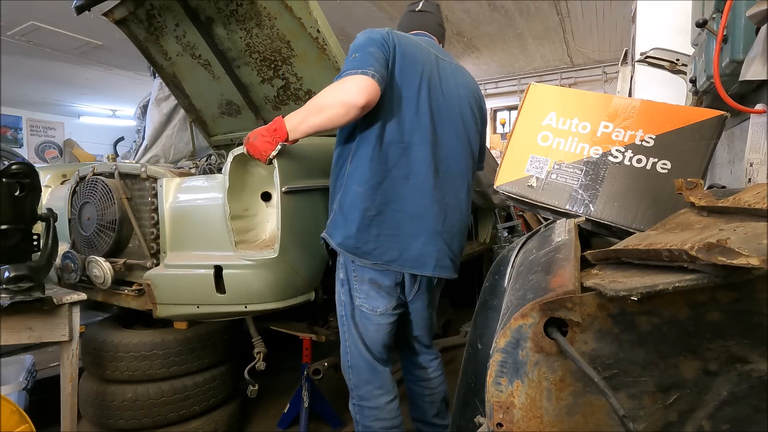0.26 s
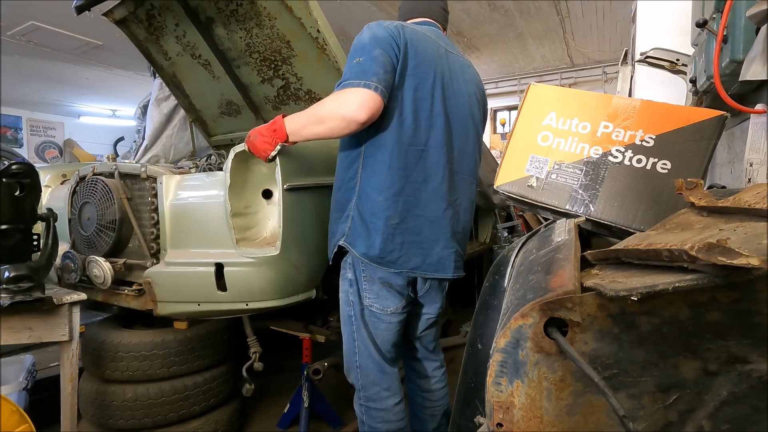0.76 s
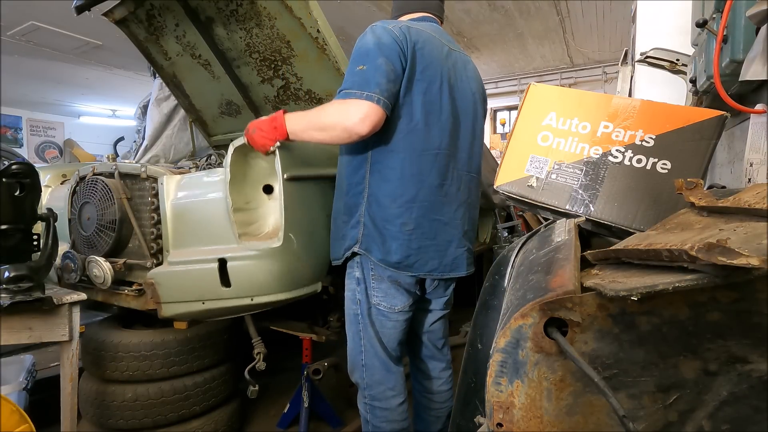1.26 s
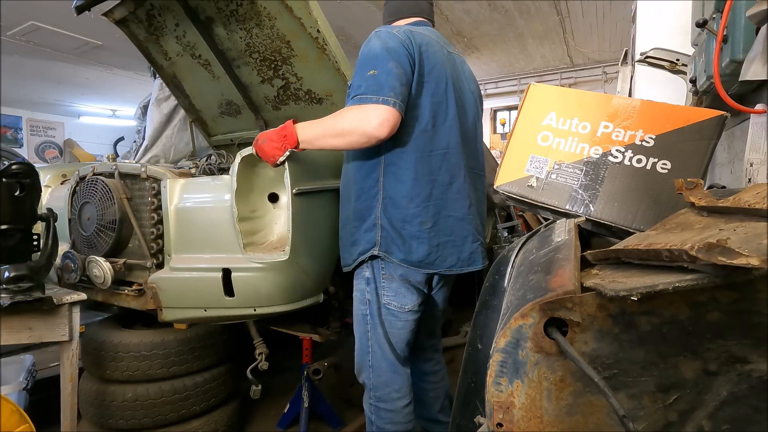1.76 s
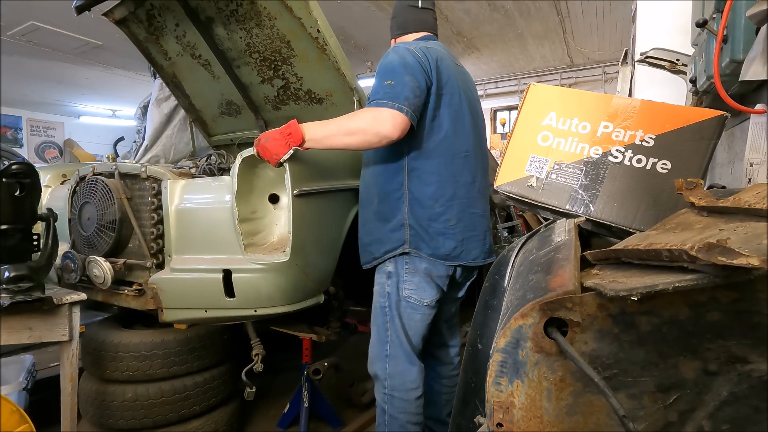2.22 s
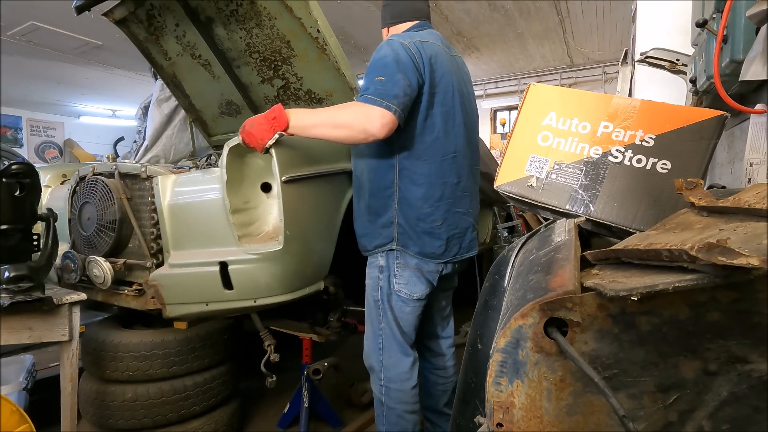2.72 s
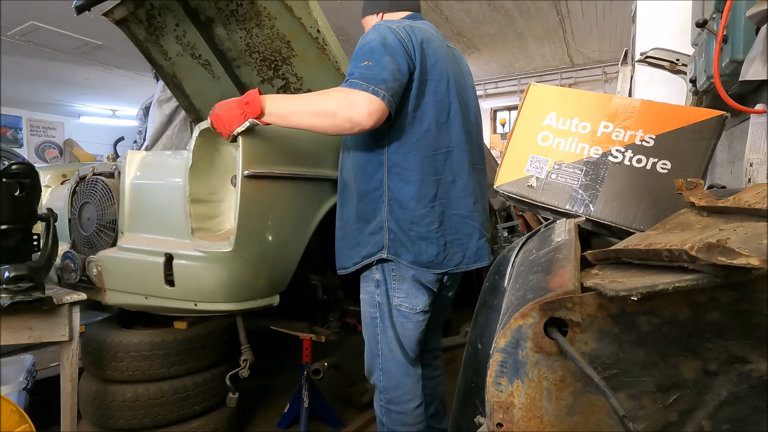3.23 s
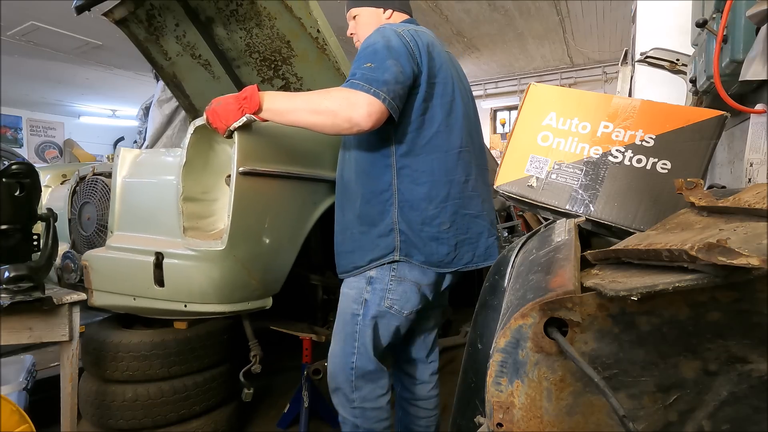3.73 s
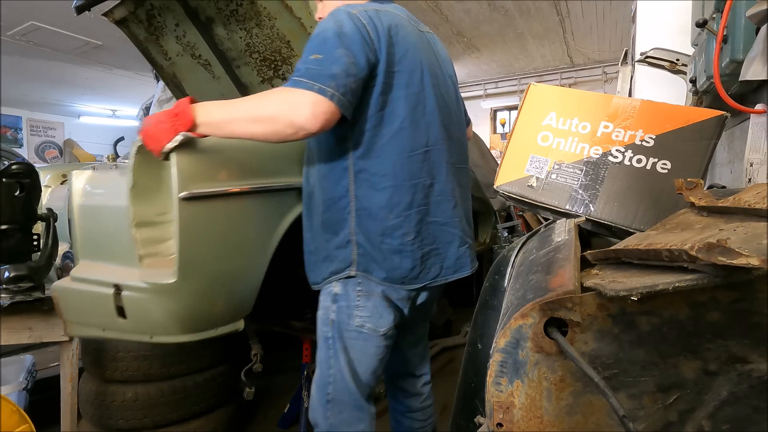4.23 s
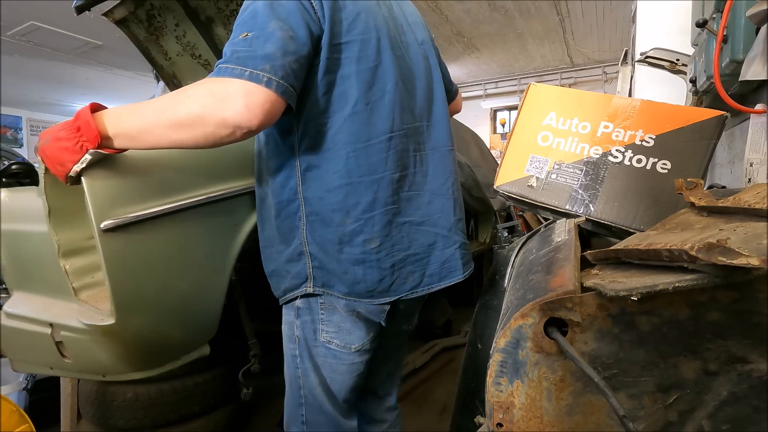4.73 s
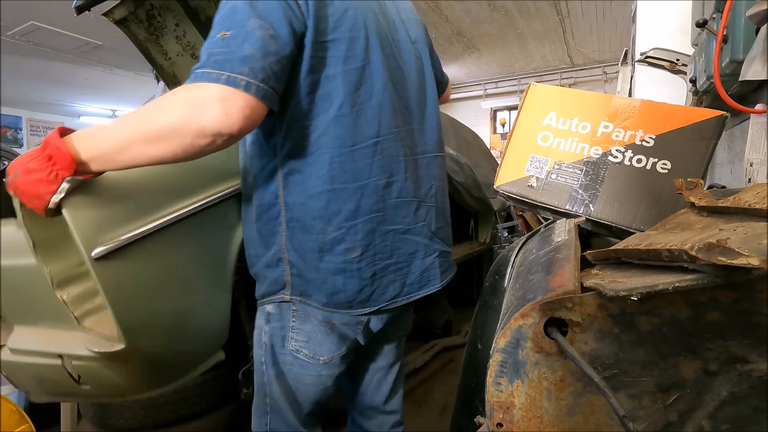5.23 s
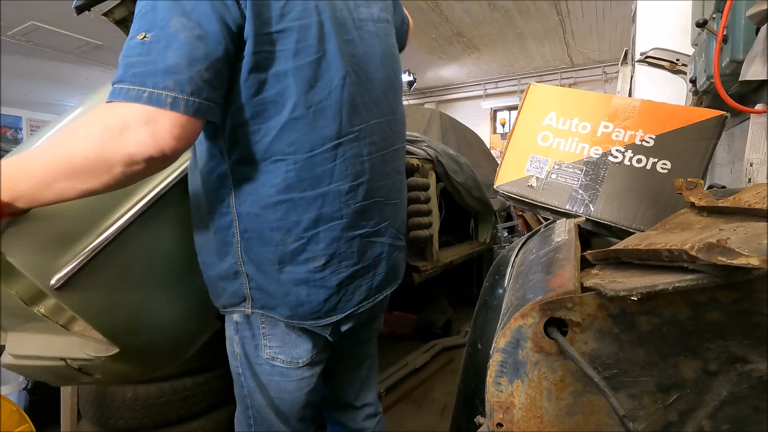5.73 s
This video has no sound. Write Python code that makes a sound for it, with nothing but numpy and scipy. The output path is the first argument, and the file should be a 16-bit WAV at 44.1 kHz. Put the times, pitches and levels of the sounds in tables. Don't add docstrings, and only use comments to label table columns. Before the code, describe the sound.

A large thin car panel is worked off by hand indoors. Bursts of dull metallic knocking and deep wobbling boom alternate with scrapes, peaking in a violent double clatter. It then hangs free with faint ticks and glove rustle, strikes the body once more with a short ring, and leaves with scuffs and small knocks. Close stereo pickup, moderate garage reverberation, faint steady hum.

```python
import sys
import numpy as np
from scipy import signal
from scipy.fft import rfft, irfft, next_fast_len
from scipy.io import wavfile
from scipy.ndimage import uniform_filter1d, map_coordinates

SR = 44100
rng = np.random.default_rng(int(sys.argv[2]) if len(sys.argv) > 2 else 0)


def to_linear_factor(level_db):
    exponent = np.asarray(level_db, float) / 20
    return 10 ** exponent


def unload_audio(sound):
    columns = np.transpose(np.atleast_2d(sound))
    steps = np.round(np.clip(columns, -1, 1) * 32767)
    wavfile.write(sys.argv[1], SR, steps.astype(np.int16))


N = 263277
FREE_S = 3.76
RASP_LOW_DB, RASP_TOP_DB = -12, -16


def unit(x):
    return x / np.sqrt(np.mean(x ** 2) + 1e-20)


def along(points, hz):
    f, v = np.transpose(points)
    return np.interp(np.log(hz + 1), np.log(f + 1), v)


def curves(rows):
    s, *cols = np.transpose(rows)
    return [np.interp(np.arange(N) / SR, s, c) for c in cols]


def wobble(rate):
    knots = rng.standard_normal(int(N * rate / SR) + 4)
    return map_coordinates(knots, [np.arange(N) * rate / SR])


def filtered(x, response):
    m = next_fast_len(x.shape[-1] + 4096)
    return irfft(rfft(x, m) * response(np.fft.rfftfreq(m, 1 / SR)), m)[..., :x.shape[-1]]


def add(out, s, sound):
    out[round(s * SR):][:len(sound)] += sound


# (frequency [Hz], likeness [0..1])
LIKENESS = [(60, .999), (150, 0.86), (400, 0.76), (1500, 0.58), (6000, 0.78), (12000, 0.82)]


def paired(two, spectrum):
    def shares(hz):
        turn = np.arccos(np.clip(along(LIKENESS, hz), -1, 1)) / 2
        return to_linear_factor(along(spectrum, hz)) * [np.cos(turn), np.sin(turn)]

    mid, side = filtered(two, shares)
    return np.array([mid + side, mid - side])


def dying(decays, size, channels):
    hz, t, z = signal.stft(rng.standard_normal((channels, size)), SR, nperseg=256)
    fade = to_linear_factor(-60 * t / along(decays, hz)[:, None])
    tail = signal.istft(z * fade, SR, nperseg=256)[1][:, :size]
    return tail / np.linalg.norm(tail[0])


def ringing(modes, t, damp, spread_db):
    hz, db, t60 = np.transpose(modes)[:, :, None]
    luck = rng.standard_normal((2, len(modes), 1))
    fade = to_linear_factor(db + spread_db * luck[0] - 60 * t / (np.clip(t60, .05, .7) * damp))
    return fade * np.sign(luck[1]) * np.sin(2 * np.pi * hz * t)


def favour(hz, centre_hz, octaves):
    return np.exp(-.5 * (np.log2((hz + 1) / centre_hz) / octaves) ** 2)


# (multiple, level [dB])
MACHINE = [(1, -34), (2, -17), (3, -20), (4, -70), (5, -8), (6, 14), (7, 12.5), (8, 10), (9, 7), (10, 4.5),
           (11, 16.5), (12, 14.5), (13, -7), (14, -8), (15, 6), (16, 4), (17, -3), (18, -25.5), (19, -45),
           (20, -21), (21, -14), (22, -30)]
# (frequency [Hz], level [dB per Hz])
AIR_COLOUR = [(90, -52), (140, -5), (200, -12.5), (289, -17), (364, -11.5), (458, -32.5), (560, -23.5),
              (850, -45.5), (1250, -35.5), (2230, -57), (7000, -41), (9000, -59.5), (14600, -76)]
# (time [s], level [dB])
MACHINE_LEVEL = [
    (0, -50.5),
    (2.3, -50.5),
    (3.3, -53),
    (4.3, -53),
    (5.6, -51),
    (5.66, -49.5),
    (5.97, -51.5),
]


def garage():
    shaft_hz = 25.77
    turn = 2 * np.pi * np.cumsum(shaft_hz * (1 + 0.00244 * wobble(1.78))) / SR
    hum = sum(to_linear_factor(db + 2.9 * wobble(9.3)) * np.sin(k * turn + 0.97 * rng.standard_normal())
              for k, db in MACHINE)
    air = paired(rng.standard_normal((2, N)), AIR_COLOUR)
    return to_linear_factor(curves(MACHINE_LEVEL)[0] - 1.0) * unit(hum) * to_linear_factor([[.3], [-.3]]) + to_linear_factor(-58) * unit(air)


# (frequency [Hz], t60 [s])
WALL_DECAY = [(80, 0.52), (200, 0.81), (500, 0.55), (2000, 0.67), (10000, 0.48)]


def walls():
    tail = paired(dying(WALL_DECAY, SR * 3 // 4, channels=2), [(100, 0.0077)])
    return np.pad(tail, ((0, 0), (260, 0)))


TAIL_STARTS = [0, .53, 1.3, 1.53, 1.68, 2.02, 2.63, 2.75, 3.19, 4.38, 4.77]


def changing_answer(x):
    out = np.zeros((2, N + SR))
    marks = [round(s * SR) for s in TAIL_STARTS] + [N]
    for a, b in zip(marks, marks[1:]):
        echo = signal.fftconvolve(x[None, a:b], walls(), axes=1)
        out[:, a:a + echo.shape[1]] += echo
    return out[:, :N]


# (frequency [Hz], t60 [s])
NEAR_DECAY = [(200, .03), (2000, 0.049), (10000, 0.11)]
# (frequency [Hz], level [dB])
UNLIKENESS = [(100, -39), (400, -14), (1500, -2.5), (4000, -7), (12000, -28.5)]


def near_echoes(edge):
    near = dying(NEAR_DECAY, SR // 10, channels=1)[0]
    echoes = filtered(signal.fftconvolve(edge, near)[:N], lambda hz: to_linear_factor(along(UNLIKENESS, hz)))
    return echoes * [[1], [-1]]


# (time [s], level [dB])
STROKES = [(0.0, -63.5), (0.25, -64.5), (0.45, -57), (0.62, -47), (1.15, -65.5), (1.51, -59.5),
           (1.7, -43.5), (2.18, -68.5), (2.5, -57.5), (2.7, -39), (3.0, -55), (3.62, -60.5), (4.1, -72),
           (4.56, -57.5), (5.2, -66), (5.33, -56), (5.7, -51), (5.97, -62)]
# (frequency [Hz], level [dB per Hz])
RUSH_COLOUR = [(760, -20), (1300, -5), (1640, -9.5), (1800, -6), (2530, -8), (2830, -9.5), (5090, -13),
               (12000, -28.5), (14600, -47)]
# (frequency [Hz], level [dB per Hz])
GRIND_COLOUR = [(300, -37), (550, 2), (800, -6.5), (1250, -0.5), (1700, -14), (2800, -43.5)]


def rub():
    press = to_linear_factor(.7 * wobble(25))
    rush = rng.standard_normal((2, N))
    grit = unit(rng.standard_normal((2, N)) * (rng.random(N) < .012))
    return press * (rush + to_linear_factor(-6) * grit)


def scrape():
    rush_db, = curves(STROKES)
    grind_db = rush_db + 18.5 + 0.63 * shaking()
    rush = to_linear_factor(rush_db - 2.0) * unit(paired(rub(), RUSH_COLOUR))
    return rush + to_linear_factor(grind_db) * unit(paired(rub(), GRIND_COLOUR))


def shaking():
    settle_s, still_db = 0.93, -41.5
    t = np.arange(N) / SR
    power = sum(to_linear_factor(2 * (db - 60 * (t - s) / settle_s)) * (t > s) for s, db, *rest in BENDS)
    return 10 * np.log10(np.abs(uniform_filter1d(power, size=SR // 25)) + to_linear_factor(2 * still_db))


# (frequency [Hz], level [dB per Hz])
RUMBLE_COLOUR = [(15, -6), (30, 2), (60, 16.5), (85, -10.5), (120, -51.5)]


def rumble():
    noise = to_linear_factor(5.9 * wobble(14)) * rng.standard_normal(N)
    deep = filtered(noise, lambda hz: to_linear_factor(along(RUMBLE_COLOUR, hz)))
    freed_db, = curves([(FREE_S, 0), (FREE_S + 0.14, -20.5)])
    return to_linear_factor(-34 + 0.61 * shaking() + freed_db) * unit(deep)


# (frequency [Hz], level [dB], t60 [s])
PANEL_MODES = [(51.7, -7, 0.35), (66.03, 3.5, 0.25), (77.78, -8.5, 0.93), (102, 1.5, 0.28),
               (121, 1.5, 0.18), (146.3, -2, 0.41), (168.5, -1.5, 0.27), (202, -6, 0.43),
               (217.06, -3.5, 0.38), (242.2, -1, 0.16), (278.5, -0.5, 0.22), (333, 0.5, 0.18),
               (368.2, -9, 0.33), (393.8, -3.5, 0.17), (447, -4.5, 0.048)]
# (time [s], peak level [dB], favoured pitch [Hz], deep share [dB], ring time [factor])
BENDS = [(0.0003, -29.5, 170, 5.5, 0.86), (0.569, -25, 174, -12, 0.59), (0.636, -14.5, 156, 3, 1.9),
         (0.689, -23, 75, 4, 1.7), (0.735, -15.5, 94, -2.5, 1.22), (0.806, -25.5, 164, 1, 1.2),
         (0.89, -26.5, 74.4, 8, 0.79), (1.037, -34, 56, 12.5, 0.72), (1.344, -24.5, 158.4, 1.5, 2.9),
         (1.476, -21.5, 101, 0, 0.35), (1.522, -25, 85, 3, 2.4), (1.705, -22, 247, -30, 2.5),
         (1.735, -18.5, 406, -5, 0.78), (1.777, -20.5, 52.7, -14, 1.47), (2.655, -11, 163.8, -9.5, 2),
         (2.701, -17, 165, -1, 1.8), (2.748, -12.5, 102, 0.5, 0.63), (2.8, -18, 139, 3.5, 1.02),
         (2.861, -19, 59.2, -12, 1.12), (3.042, -34, 152.5, 10.5, 0.55), (4.394, -23, 217, -0.5, 2.4),
         (4.437, -32.5, 66.6, 2, 1.8), (4.53, -24, 202, -15, 0.36)]
# (time [s], peak level [dB], favoured pitch [Hz], deep share [dB])
SHIFTS = [(0.075, -41, 131.7, 10), (0.6, -25, 145, 0), (1.41, -30.5, 112.5, -1), (1.619, -38, 121, 16),
          (2.039, -41.5, 73.5, 8.5), (2.258, -45.5, 72, 8.5), (2.499, -42, 166, -27), (2.582, -34, 157, -7),
          (3.138, -42.5, 53.6, 12), (3.267, -47, 70.5, 10), (3.346, -48.5, 58.7, 9), (3.496, -42, 302, -22),
          (3.714, -43.5, 128, 7.5), (4.187, -54, 286, -0.5), (4.607, -73, 202, -5), (4.726, -63, 193, -28),
          (5.263, -43, 162, 1), (5.804, -58, 158, 7)]


def boom():
    push_s = 0.0042
    out, t = np.zeros(N + SR), np.arange(SR * 3 // 5) / SR
    modes_hz = np.transpose(PANEL_MODES)[0]
    for s, db, centre_hz, deep_db, damp in BENDS + [(*row, 1) for row in SHIFTS]:
        upper_db = -4.5 if s < FREE_S else -3
        share_db = along([(95, deep_db), (125, 0.0067), (185, 0.0045), (215, upper_db)], modes_hz)
        share_db = share_db + 11 * favour(modes_hz, centre_hz, 0.067)
        ring = to_linear_factor(share_db) @ ringing(PANEL_MODES, t, np.clip(damp, .2, 2), spread_db=1.5)
        add(out, s, to_linear_factor(db - 9) * ring * (1 - np.exp(-t / push_s)))
    return out[:N]


# (frequency [Hz], level over the crowd [dB], t60 [s])
STEEL_MODES = [(447, 0.5, 0.32), (563, -1.5, 0.95), (724, 1, 0.77), (850, -14, 0.17), (1040, 2, 0.11),
               (1224, 0.5, 0.11), (1300, -13, 0.26), (1670, -24, 0.23), (1760, -14, 0.17),
               (2100, -19, 0.18), (2290, 4.5, 0.27), (2500, 8, 0.16), (3000, -2.5, 0.12), (3090, 5, 0.18),
               (3400, -5, 0.31), (4280, 12.5, .15), (5380, -2.5, 0.14), (6960, 12.5, 0.11)]
# (frequency [Hz], t60 [s])
CROWD_DECAY = [(400, 0.76), (1500, 0.18), (4000, 0.19), (12000, 0.097)]
# (frequency [Hz], level [dB per Hz])
CONTACT_COLOUR = [(200, -20), (400, -3.5), (700, -5.5), (1500, -4.5), (2500, -12.5), (4500, -14),
                  (7000, -16.5), (10000, -21.5), (14600, -35.5)]


def contact(row, ms, damp, swell, spike, favour_db):
    s, db, centre_hz, low_db, top_db = row
    t, ms = np.arange(SR // 3) / SR, np.clip(ms, 1, 40)
    u = t[:SR // 8] * 1000 / ms
    spikes = rng.standard_normal(len(u)) * to_linear_factor(spike * rng.standard_normal(len(u)))
    chatter = spikes * u ** swell * np.exp(-u)
    crowd = dying([(hz, t60 * damp) for hz, t60 in CROWD_DECAY], len(t), channels=1)[0]
    crowd[0] += to_linear_factor(-4.5)
    clear = ringing(STEEL_MODES, t, damp, spread_db=2).sum(0)
    clear = clear * (1 - np.exp(-t * 1000 / ms)) ** (1 + swell)
    steel = unit(signal.fftconvolve(chatter, crowd)[:len(t)])
    steel = steel + to_linear_factor(-16.0 + 0.11 * (db + 16.5)) * unit(clear)
    tilt = [(800, low_db - 2.0), (2000, 0.0036), (3500, 0.039), (8000, top_db + 12.5)]

    def colour(hz):
        return to_linear_factor(along(CONTACT_COLOUR, hz) + along(tilt, hz) + favour_db * favour(hz, centre_hz, .26))

    hit = filtered(steel, colour)
    band = filtered(hit[:SR // 15], lambda hz: (hz > 1500) & (hz < 5000))
    return to_linear_factor(db - 16.0) * hit * np.cos(np.pi / 2 * t / t[-1]) / band.std()


# (time [s], peak level [dB], favoured pitch [Hz], low share [dB], top [dB])
RATTLES = [(0.692, -38.5, 3000, -11, -23), (1.3348, -35.5, 1510, 2, -22.5), (1.39, -52, 1180, -6, -24),
           (1.44, -48, 1200, 12, -19), (1.6057, -36, 2500, 8.5, -11.5), (2.763, -30, 3900, -5, -15),
           (3.232, -46, 5000, -21, -5), (3.39, -77, 1970, -7, -20), (3.513, -44, 4500, -3, -4),
           (3.6, -48.5, 2200, -18, -16), (4.531, -31.5, 5500, -13, -19), (4.7874, -49.5, 5800, -21, -14)]
# (time [s], peak level [dB], favoured pitch [Hz], swell time [ms])
CLOTH = [
    (3.25, -49, 4400, 26),
    (3.301, -64, 3530, 20),
    (4.94, -47.5, 3000, 42),
    (5.05, -44.5, 3000, 36),
    (5.752, -44, 3500, 6.6),
    (3.17, -50, 2000, 20),
    (3.74, -53, 2500, 22),
]


def rebounds():
    out = np.zeros(N + SR)
    rows = [(*row, 3.5) for row in RATTLES]
    rows += [(s, db, hz, RASP_LOW_DB, RASP_TOP_DB, ms) for s, db, hz, ms in CLOTH]
    for *row, ms in rows:
        add(out, row[0], contact(row, ms=ms, damp=0.98, swell=0.31, spike=6.1, favour_db=5))
    return out[:N]


# (time [s], peak level [dB], favoured pitch [Hz], low share [dB], top [dB])
GLANCES = [(0.4547, -29, 1000, -10.5, -23.5), (0.566, -26, 2384, 7, -22), (0.584, -26, 1250, 15, -11.5),
           (0.6094, -24, 563, 3, -64.5), (1.1439, -42.5, 1210, -3.5, -49), (1.691, -21, 1040, 2, -17.5),
           (2.583, -38.5, 1320, 5, -13.5), (3.72, -47.5, 880, 2.5, -5), (2.6679, -12, 2370, -33, -11),
           (2.7576, -16, 1120, -13, -21.5), (2.774, -27.5, 3270, 10, -41.5), (4.58, -47.5, 620, 6, -36.5),
           (4.826, -38, 738, 2, -7.5), (5.5567, -52, 1300, 9, -22.5), (5.9104, -45, 2160, -9, -22)]
# (time [s], peak level [dB], favoured pitch [Hz], swell time [ms])
RUST = [(0.325, -35, 4320, 44), (0.371, -41.5, 4720, 55), (0.416, -26, 4570, 21.4),
        (2.417, -38.5, 4240, 54), (2.46, -31.5, 3400, 22.7), (2.5064, -54, 3150, 6.7),
        (3.498, -42, 3520, 13.5), (3.758, -46.5, 3480, 8.3), (4.8496, -36.5, 4030, 10.6),
        (5.11, -48, 4760, 6.2), (5.267, -44, 3870, 5.1), (5.757, -43, 1510, 7.1)]
# (time [s], peak level [dB], favoured pitch [Hz], swell time [ms])
TRIM = [
    (0.5962, -29, 8050, 5.7),
    (1.596, -30, 11800, 9),
    (2.675, -17, 6960, 6.4),
    (3.2686, -45.5, 6800, 12.5),
    (4.5195, -33.5, 5800, 2.5),
    (4.777, -36.5, 5000, 49),
]


def slides():
    out = np.zeros(N + SR)
    rows = [(*row, 6.5 * np.exp(-0.01 * (row[1] + 10)), 6, 0.71) for row in GLANCES]
    rows += [(s, db, hz, RASP_LOW_DB, RASP_TOP_DB, ms, 5, 1.09) for s, db, hz, ms in RUST]
    rows += [(s, db, hz, -7.5, -14, ms, 6, 0.71) for s, db, hz, ms in TRIM]
    for *row, ms, favour_db, swell in rows:
        damp = 0.78 * to_linear_factor(0.24 * (row[1] + 6))
        add(out, row[0], contact(row, ms=ms, damp=damp, swell=swell, spike=2.8, favour_db=favour_db))
    return out[:N]


# (frequency [Hz], level [dB])
ROCKED_MODES = [(670, -28), (803, -32), (891, -27), (954, -37), (1008, -31), (1136, -36), (1217, -38),
                (1308, -29), (1470, -31), (1530, -31), (1763, -33), (1949, -40), (2292, -42)]
SWAYED_MODES = [(227, -27), (295, -28), (340, -32), (455, -39), (501, -38), (561, -29), (649, -40),
                (786, -39), (1140, -44), (1293, -44)]
LEANED_MODES = [(529, -42), (565, -40), (752, -48), (927, -49), (1137, -48), (1307, -51), (1462, -51),
                (1525, -44)]
NUDGED_MODES = [(315, -37), (443, -38), (526, -42), (727, -46), (914, -47), (1163, -45), (1252, -48),
                (1373, -45), (1528, -52)]
TAPPED_MODES = [(733, -44), (840, -46), (1117, -36), (1369, -46), (1479, -49), (1818, -50)]
BUMPED_MODES = [(179, -25), (355, -29), (716, -39), (828, -38), (946, -35), (1009, -36), (1061, -33),
                (1308, -44), (1381, -40), (1877, -47), (2431, -45), (2554, -47), (2966, -45), (3129, -46)]
TOUCHED_MODES = [(931, -52), (1026, -48), (1797, -53), (1910, -55), (2004, -52), (2090, -54), (2375, -58)]
PULLED_MODES = [(419, -27), (717, -29), (1225, -30), (1443, -28), (1588, -37), (1682, -35), (1783, -33)]
TORN_MODES = [(894, -28), (1110, -33), (1432, -31), (2034, -36), (2331, -36), (2716, -31), (3300, -37),
              (3631, -39), (3980, -38), (4144, -32), (5269, -41), (6854, -40), (6959, -35), (9628, -45)]
DROPPED_MODES = [(219, -27), (398, -31), (563, -32), (712, -35), (900, -33), (1063, -38), (1141, -32),
                 (1260, -35), (1357, -35), (1685, -39), (1864, -39), (2031, -38), (2326, -42), (3103, -43)]
CARRIED_MODES = [(886, -37), (996, -39), (1211, -36), (1339, -38), (1667, -42), (1842, -43), (1949, -43),
                 (2102, -42), (2273, -43), (2513, -39), (2990, -41), (3163, -43), (4179, -40), (4347, -44)]
SWUNG_MODES = [(194, -27), (223, -28), (284, -33), (400, -34)]
GRAZED_MODES = [(3898, -51), (4352, -52), (4502, -54), (5428, -52), (5998, -52), (6126, -55)]
FADING_MODES = [(166, -27.5), (433, -42)]
EASED_MODES = [(134, -38)]
SETTLED_MODES = [(5410, -50)]
SQUEAKED_MODES = [(1916, -48), (3370, -51), (4307, -49), (5227, -54)]
SHAKEN_MODES = [(560, -39), (732, -46), (1174, -39), (1319, -48)]
SLAPPED_MODES = [(501, -33), (4177, -43)]
WIPED_MODES = [(5950, -52), (3700, -56)]
PINGED_MODES = [(2800, -40), (1012, -29)]
LINGERED_MODES = [(1180, -56), (1310, -52)]
# (time [s], level [dB], t60 at 1 kHz [s], swell time [ms])
WAKING_BLOWS = [(0.583, 7, 0.16, 9), (0.635, 6.5, 0.26, 13), (0.7, 2, 0.47, 11), (1.33, 3.5, 0.21, 8.1),
                (1.539, 10.5, 0.11, 8.3), (1.695, 3, 0.26, 5.2), (2.037, 7, 0.13, 5),
                (2.6461, 2.5, 0.13, 0.93), (2.671, 0, 0.26, 3.8), (2.763, 6.5, 0.2, 5.7),
                (4.394, 1, 0.43, 3), (4.395, 4, 0.35, 13), (4.525, 6, 0.14, 4), (0.0005, 6, 0.092, 4.1),
                (0.07, 5, 0.38, 14), (4.43, 2, .25, 15), (0.422, 7.5, .25, 12), (2.8, 7, 0.31, 9.8),
                (4.4, 2, 0.23, 13), (4.79, 4, .2, 15), (1.698, 5.5, 0.063, 5), (3.0, 0.5, 0.75, 25)]


def peals():
    flutter_db, flutter_per_s = 2.2, 45
    out, t = np.zeros(N + SR), np.arange(SR // 2) / SR
    grips = [ROCKED_MODES, SWAYED_MODES, LEANED_MODES, NUDGED_MODES, TAPPED_MODES, BUMPED_MODES,
             TOUCHED_MODES, PULLED_MODES, TORN_MODES, DROPPED_MODES, CARRIED_MODES, SWUNG_MODES,
             GRAZED_MODES, FADING_MODES, EASED_MODES, SETTLED_MODES, SQUEAKED_MODES, SHAKEN_MODES,
             SLAPPED_MODES, WIPED_MODES, PINGED_MODES, LINGERED_MODES]
    for (s, db, t60, ms), modes in zip(WAKING_BLOWS, grips):
        hz, level_db = np.transpose(modes)[:, :, None]
        lasts = np.clip(t60, .03, 1) * (1000 / hz) ** 0.11
        knots = rng.standard_normal((len(modes), flutter_per_s))
        flutter = np.array([np.interp(t * flutter_per_s, np.arange(len(row)), row) for row in knots])
        fade = to_linear_factor(level_db + flutter_db * flutter - 60 * t / lasts)
        ring = (-1) ** np.arange(len(modes)) @ (fade * np.sin(2 * np.pi * hz * t))
        swell = 1 - np.exp(-t * 1000 / np.clip(ms, 1, 20))
        add(out, s, to_linear_factor(db) * ring * swell * np.cos(np.pi * t))
    return out[:N]


# (time [s], peak level [dB], pitch [Hz])
CLICKS = [
    (1.3283, -42, 1530),
    (2.0358, -52, 2020),
    (2.6468, -19, 1800),
    (2.776, -17, 1800),
    (3.2028, -44, 7540),
    (4.3936, -19, 2500),
    (5.762, -36.5, 1980),
    (5.8865, -48, 6000),
    (5.9548, -34, 6500),
]


def snaps():
    out, t = np.zeros(N + SR), np.arange(SR // 100) / SR
    for s, db, hz in CLICKS:
        add(out, s, to_linear_factor(db) * np.sin(2 * np.pi * hz * t) * np.exp(-t * hz / 1.7))
    return out[:N]


# (time [s], peak level [dB], favoured pitch [Hz], low share [dB], top [dB])
BLOWS = [(0.7, -58.5, 514, 9.5, -34), (0.7609, -49, 730, 16, -40), (0.859, -43, 600, 6.5, -13),
         (0.906, -39.5, 1220, 0, -58), (1.327, -33, 1424, 10, -38), (1.3613, -56, 510, -10, -39),
         (1.537, -31.5, 1160, 5, -18), (1.771, -30.5, 1040, -3.5, -23), (1.8472, -39, 970, 2.5, -18),
         (2.0354, -31.5, 2080, -5, -20), (2.6461, -19, 1300, 8.5, -23), (2.711, -19.5, 706, -25, -12.5),
         (3.2025, -44.5, 2340, -53, 0), (4.3933, -14.5, 2510, -2.5, -18), (5.038, -48, 3660, -10, -17),
         (5.896, -47.5, 2200, -15, -24), (5.955, -40.5, 1210, -10, -24)]
# (time [s], peak level [dB], favoured pitch [Hz], low share [dB], top [dB])
TOUCHES = [(0.001, -42, 2900, 3.5, -8), (0.233, -55, 2200, -37, -11), (1.01, -50, 527, -5, -7.5),
           (1.1118, -49.5, 850, 5, -17), (2.246, -53.5, 540, -5, -13), (3.079, -45, 5530, 8, -15),
           (3.357, -46.5, 1800, -23, -22), (3.4563, -58, 4030, -36, 3), (3.574, -54.5, 4030, -5, 6.5),
           (4.2046, -53, 560, -12, -13), (4.2892, -58, 587, -15, -14), (4.729, -46.5, 554, -31, -19),
           (5.0227, -48, 630, -1.5, -16), (5.2427, -56, 614, 6, -13.5), (5.886, -49, 6050, -22, -18)]
# (time [s], peak level [dB])
FLANK_BLOWS = [
    (0.65, -38),
    (2.82, -36),
    (2.8994, -43),
    (4.41, -19),
    (4.4493, -30.5),
]


def blow_ring(s, db):
    grip = 3.4 if s < 4.3 else 0.81
    shorter = 0.67 if 1.9 < s < 2.3 else 1
    return grip * shorter * to_linear_factor(0.7 * (db + 20))


def knocks():
    flank_hz, sing_s = 559, 0.4
    out, t = np.zeros(N + SR), np.arange(SR // 2) / SR
    rows = [(*row, blow_ring(row[0], row[1])) for row in BLOWS]
    rows += [(*row, 0.58) for row in TOUCHES]
    rows += [(s, db, flank_hz, -0.5, -27, 0.49) for s, db in FLANK_BLOWS]
    for *row, damp in rows:
        damp = np.clip(damp, .2, 1.6)
        add(out, row[0], contact(row, ms=6.1, damp=damp, swell=0.39, spike=1.77, favour_db=6))
    for s, db in FLANK_BLOWS:
        fade = to_linear_factor(db - 7 - 60 * t / sing_s)
        add(out, s, fade * np.sin(2 * np.pi * flank_hz * t) * (1 - np.exp(-t / 0.023)))
    return out[:N]


def scene():
    around = scrape() * to_linear_factor([[.6], [-.6]]) + garage()
    panel = boom() + rumble()
    edge = rebounds() + slides() + peals() + snaps() + knocks()
    steel = edge * to_linear_factor([[1], [-1]]) + near_echoes(edge) + panel * to_linear_factor([[.35], [-.35]])
    return steel + changing_answer(to_linear_factor(-9.0) * edge + to_linear_factor(-10.5) * panel) + around


def roll_off(x):
    return signal.sosfilt(signal.butter(12, 14710, fs=SR, output="sos"), x)


def record(dry):
    lag_s = np.array([[.7], [0]]) / SR
    port_db = [(7700, 0.5), (8300, -3.0), (12500, -1.0), (14500, -8.5), (15800, -6.5)]
    heard = filtered(dry, lambda hz: np.exp(-2j * np.pi * hz * lag_s) * to_linear_factor(along(port_db, hz)))
    top, knee = .62, 3.6
    finished = heard / (1 + np.abs(heard / top) ** knee) ** (1 / knee)
    return roll_off(finished)


dry = scene()
out = record(dry)
unload_audio(out)
```